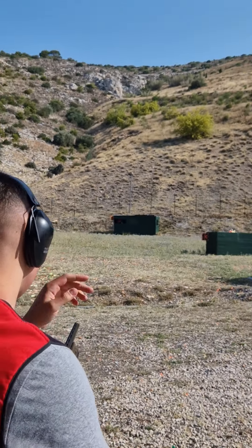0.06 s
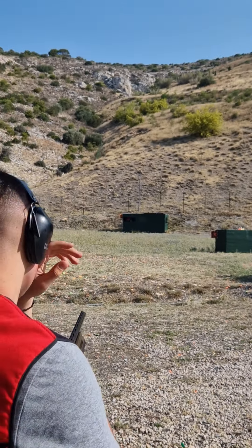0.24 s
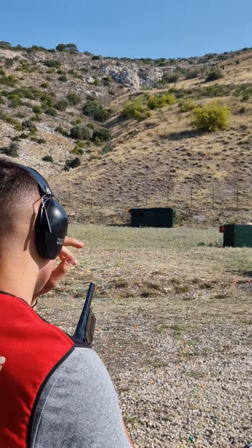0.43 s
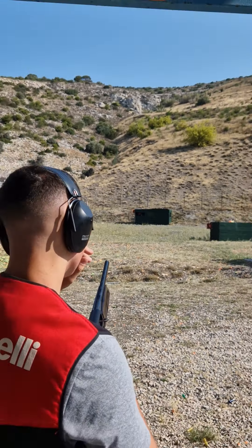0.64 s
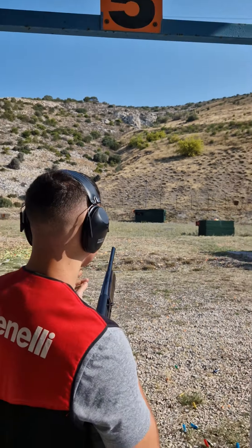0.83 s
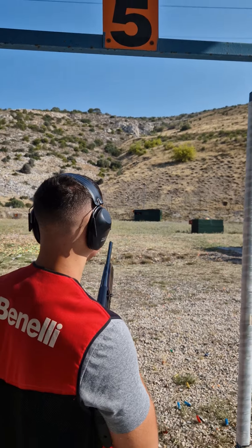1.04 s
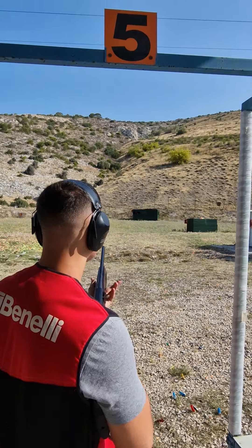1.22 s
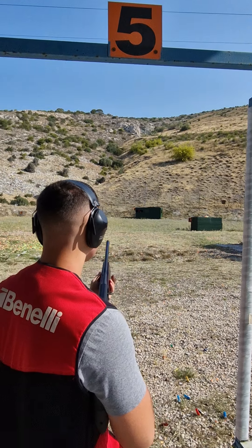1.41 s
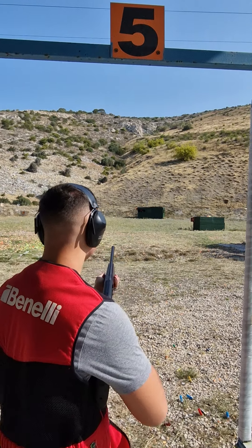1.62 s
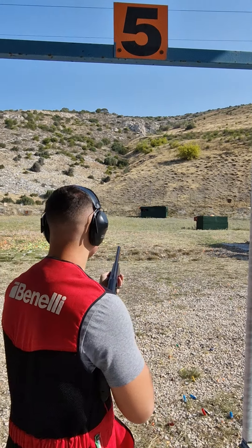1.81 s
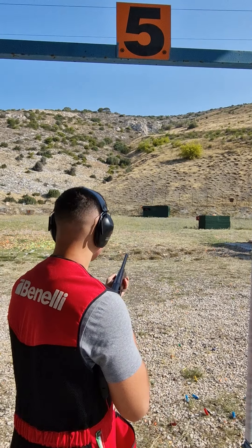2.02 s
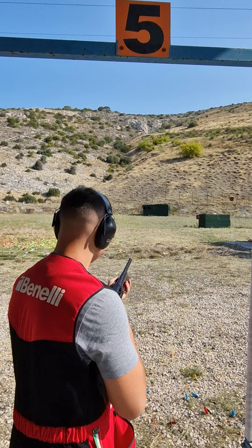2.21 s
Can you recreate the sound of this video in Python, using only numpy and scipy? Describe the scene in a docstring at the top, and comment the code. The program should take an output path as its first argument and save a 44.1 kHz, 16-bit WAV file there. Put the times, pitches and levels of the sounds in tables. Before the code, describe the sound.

One shotgun blast echoes off a hillside, followed by faint gun handling clicks.

```python
"""An open clay range: wind on the microphone, thin hiss, a faint far drone, an earlier shot's dying echo.
At 0.2 s a shotgun fires a metre away: shock front, boom and gas crack, then hard reflections from the
stand, slaps from huts and banks, and scatter off stony ground. From 0.47 s the hillside rolls back.
From 1.1 s the gun is lowered and handled: cloth brushes, steel ticks and rings, the stock knocks."""
import sys
import numpy as np
from scipy import signal
from scipy.fft import rfft, irfft, next_fast_len
from scipy.io import wavfile

SR = 44100
rng = np.random.default_rng(int(sys.argv[2]) if len(sys.argv) > 2 else 0)


def digitize_waveform(pressure):
    """Quantize a signal to 16-bit integers and store it at the path in sys.argv[1].

    Rows of a 2-D input are taken as channels; values are limited to [-1, 1].
    """
    field = np.atleast_2d(pressure).T
    bounded = np.clip(field, -1, 1)
    quanta = np.round(bounded * 32767).astype(np.int16)
    wavfile.write(sys.argv[1], SR, quanta)


N = 103635
T = np.arange(N) / SR
FFT_SIZE = next_fast_len(N, real=True)
HZ = np.maximum(np.arange(FFT_SIZE // 2 + 1) * SR / FFT_SIZE, 1)

# Noise spectra. Each row: frequency in Hz, relative density in dB.
WIND_SPECTRUM = [(25, -7), (45, 4.5), (75, 4), (115, -3), (150, -15.5), (200, -21.5), (280, -23.5),
                 (400, -30)]
HISS_SPECTRUM = [(200, -11.5), (450, -12), (800, -9.5), (1100, -8.5), (1900, -17), (2500, -11.5),
                 (3900, -24), (4500, -4.5), (5500, -2.5), (6400, -14.5), (7600, -8), (11600, -7.5),
                 (12800, -25), (16000, -25)]
RUSTLE_SPECTRUM = [(200, -0.5), (350, 1.5), (700, 3), (1200, 0.5), (1800, -7.5), (2200, -6.5),
                   (4000, -17.5)]
CLICK_SPECTRUM = [(1500, -19), (3000, -4), (5000, 6), (7500, -6), (11000, -4), (16000, -16)]
KNOCK_SPECTRUM = [(100, 5), (220, 5), (700, 2.5), (1900, -3), (2800, -24), (6000, -40)]
HILL_SPECTRUM = [(76, -39.5), (130, -5.5), (236, -18), (373, -9), (482, -9.5), (911, -5.5), (1300, -8.5),
                 (2180, -9.5), (2720, -14), (3250, -10), (6910, -19.5), (7630, -15), (8950, -27),
                 (15000, -47)]
SCATTER_SPECTRUM = [(24, -45), (40, -10.5), (118, 4.5), (189, -3.5), (337, -11), (382, -11), (663, -14),
                    (1440, -6), (1760, -12.5), (2320, -9.5), (2840, -16), (6820, -19), (7730, -18),
                    (9690, -31), (16000, -38)]
CRACK_SPECTRUM = [(120, -26), (250, -1), (400, -8.5), (700, 2.5), (1100, -20), (1500, -7), (2200, -10),
                  (3200, -17), (5200, -10.5), (7700, -15), (9000, -19.5), (16000, -22.5)]
# Likeness of the two microphone ports. Each row: frequency in Hz, correlation.
PORT_CORRELATION = [(130, 0.8), (300, 0.9), (700, .82), (1400, 0.38), (3000, 0.42), (7000, -0.04),
                    (13000, 0.07)]
# Stereo balance. Each row: frequency in Hz, left over right in dB.
PORT_BALANCE = [(100, -1), (300, 1.5), (700, 0), (2300, 1.3), (4400, -1.5), (8000, -6.5), (10000, 2.5),
                (15000, 1.5)]
HISS_BALANCE = [(500, 1), (2000, 2), (5000, -5), (7500, -7.5), (11000, 4)]
BLAST_BALANCE = [(100, 2.5), (700, 4), (2300, 0.5), (4400, -6), (7500, 0), (10000, -2), (15000, 3.5)]
# Wind strength. Each row: time in seconds, level in dB.
GUSTS = [(0, -31.5), (.6, -36), (.86, -37.5), (.92, -31.5), (1.12, -33), (1.24, -41.5), (1.33, -36),
         (1.62, -37), (2.0, -39), (2.12, -42.5), (2.35, -42.5)]
# Cloth strokes. Each row: start in seconds, level in dB, time to peak in seconds.
RUSTLES = [(1.098, -42, 0.019), (1.328, -44.5, 0.021), (1.409, -48.5, 0.048), (1.526, -53.5, 0.036),
           (1.627, -46.5, 0.039), (1.751, -46, 0.045), (1.879, -53.5, 0.027)]
# Gun handling. Each row: start in seconds, click in dB, knock in dB, knock cutoff in Hz,
# left over right in dB.
CONTACTS = [(1.442, -43, -43, 2000, 10), (1.548, -50, -40, 900, -2), (1.586, -40, -38, 2500, -4),
            (1.7841, -58, -29.5, 900, -11), (1.8066, -40, -33.5, 4000, -12),
            (1.835, -39.5, -59.5, 2000, -17), (1.8685, -54, -39, 1470, 10), (1.8772, -42, -45, 1970, -11)]
# Hillside foot, then face. Each row: delay in seconds, level in dB, rise in seconds.
HILL_SLOPES = [(.27, -27.5, 0.017), (.383, -27, 0.0067)]
# Echo decay. Each row: frequency in Hz, time to fall 60 dB in seconds.
HILL_T60 = [(130, 1.7), (300, 4.6), (800, 1.89), (2000, 1.93), (4000, 1.58), (8000, 1.19), (14000, .9)]
SCATTER_T60 = [(60, 0.96), (150, 0.87), (600, 0.97), (1500, 1), (4000, 1), (8000, 1), (14000, 0.95)]
# Echoes from huts and banks. Each row: start in seconds, level in dB, centre in Hz, half-width in
# octaves, time to peak in seconds, left over right in dB, clean share of power from 0 to 1.
SLAPS = [(0.238, -20.5, 840, 0.3, 0.0032, -6, 0), (0.2895, -18.5, 1650, .4, 0.0013, 2, 0.9),
         (.3052, -5.5, 1300, .5, .0008, 2, .8), (.3056, -12, 2400, 1.5, .0006, 0, 0),
         (.3250, -18, 5000, .9, .001, -5, 0), (0.339, -30, 1427, 0.067, .025, 5, 0),
         (0.474, -24.5, 2940, 1.65, .003, -10, 0.02), (0.529, -30, 2960, 1.4, 0.009, -2, 0.04),
         (0.6026, -25.5, 1038, 0.44, 0.0026, 2, 0.5), (0.592, -31, 830, 0.44, 0.066, 0, 0.02)]
# Treble lost on a slap's path. Each row: frequency in Hz, relative gain in dB.
SLAP_AIR_LOSS = [(1000, 1), (7800, -2), (9500, -13), (16000, -15.5)]
# Direct blast, then reflections from the stand. Each row: start in seconds, shock in dB, boom in dB,
# crack in dB, crack decay in seconds, crack cutoff in Hz.
BLAST_ARRIVALS = [(0.2011, -1, -3, -10.5, .02, 18000), (0.2219, -5.5, -17.5, -18.5, .005, 4000),
                  (0.232, -46, -30, -19.5, .008, 12000), (0.2405, -14, -5, -6.5, .007, 4500),
                  (0.2427, -8, -29, -18.5, .007, 3000), (0.2538, -15.5, -22.5, -16.5, .012, 5000)]

SHOT_S, EARLIER_SHOT_S, EARLIER_SHOT_DB = 0.2013, -0.47, -1


def undb(db):
    """Decibels to gain."""
    return 10 ** (np.asarray(db) / 20)


def at(points, hz):
    """Interpolate (Hz, value) rows over log frequency."""
    points_hz, values = np.array(points, float).T
    return np.interp(np.log(hz), np.log(points_hz), values)


def pan(db):
    """Left and right gains for a level difference."""
    return undb(np.array([[1], [-1]]) * db / 2)


def left_first(x, lead_s=0.00009):
    """Sound from the left reaches the right port later."""
    return np.array([x[0], np.interp(T - lead_s, T, x[1])])


def shape(points):
    """Gain per frequency of a spectrum; 12 dB per octave roll-off past its ends."""
    inside = np.minimum(HZ / points[0][0], points[-1][0] / HZ)
    return undb(at(points, HZ)) * np.minimum(1, inside) ** 2


def bell(hz, half_width_oct):
    """Gain per frequency of one resonance."""
    return 1 / (1 + (np.log2(HZ / hz) / half_width_oct) ** 4)


def noise(gain, correlation=None, balance=PORT_BALANCE, grain_db=0):
    """Coloured stereo noise, rms 1; grain roughens it in 24-sample steps."""
    steps = np.clip(rng.standard_normal(N // 24 + 1), -2, 2)
    grains = undb(grain_db * np.repeat(steps, 24)[:N])
    mid, side = rfft(rng.standard_normal((2, N)) * grains, FFT_SIZE)
    alike = np.clip(at(PORT_CORRELATION, HZ) if correlation is None else correlation, 0, 1)
    ports = mid * np.sqrt(1 + alike) + np.array([[1], [-1]]) * side * np.sqrt(1 - alike)
    x = irfft(ports * gain * pan(at(balance, HZ)), FFT_SIZE)[:, :N]
    return x / np.std(x)


def fade(start_s, decay_s):
    """Instant attack, exponential decay."""
    return (T >= start_s) * np.exp(-np.clip((T - start_s) / decay_s, 0, 20))


def swell(start_s, rise_s):
    """Rounded burst, peaking rise_s after its start."""
    u = np.clip((T - start_s) / rise_s, 0, 20)
    return u * np.exp(1 - u)


def tail(x, start_s, rise_s, t60):
    """Fade in from start_s; each octave dies at its own rate."""
    age_s = np.maximum(T - start_s, 0)
    spectrum = rfft(x, FFT_SIZE)
    centres_hz = 31.25 * 2 ** np.arange(10)
    out = 0
    for hz, selector in zip(centres_hz, np.eye(len(centres_hz))):
        band_gain = np.interp(np.log(HZ), np.log(centres_hz), selector)
        band = irfft(spectrum * band_gain, FFT_SIZE)[:, :N]
        out += band * np.exp(-np.log(1000) * age_s / at(t60, hz))
    return out * (1 - np.exp(-age_s / rise_s))


def ambience(hiss_db=-54.5, drone_db=-61.5):
    """Steady thin hiss and a far, narrow-band drone."""
    hiss = noise(shape(HISS_SPECTRUM), balance=HISS_BALANCE)
    drone = noise(bell(hz=749, half_width_oct=0.13))
    return undb(hiss_db) * hiss + undb(drone_db) * drone


def wind(pan_db=3):
    """Gusts rumble on the microphone from the left."""
    rumble = noise(shape(WIND_SPECTRUM), correlation=0.69, balance=[(100, pan_db)])
    gust_db = np.interp(T, *np.array(GUSTS).T)
    return left_first(rumble * undb(gust_db))


def rustle():
    """Sleeve and vest brush the gun in short, dull strokes."""
    strokes = sum(undb(db) * swell(start_s, rise_s) for start_s, db, rise_s in RUSTLES)
    return left_first(noise(shape(RUSTLE_SPECTRUM)) * strokes)


def handling(ring_db=-49.5):
    """Steel ticks, the stock knocks, the barrel rings once."""
    click_noise, knock_noise = noise(shape(CLICK_SPECTRUM)), noise(shape(KNOCK_SPECTRUM))
    ring = noise(bell(hz=2161, half_width_oct=0.025)) * swell(start_s=1.437, rise_s=0.0079)
    out = undb(ring_db) * ring
    for start_s, click_db, knock_db, cutoff_hz, pan_db in CONTACTS:
        click = click_noise * fade(start_s, decay_s=0.00059)
        dulled = signal.lfilter(*signal.butter(1, cutoff_hz, fs=SR), knock_noise)
        knock = dulled / np.std(dulled) * fade(start_s, decay_s=0.0026)
        out += pan(pan_db) * (undb(click_db) * click + undb(knock_db) * knock)
    return out


def hillside(shot_s):
    """The hill on the left returns a long roll, from its foot, then its face."""
    out = 0
    for delay_s, db, rise_s in HILL_SLOPES:
        roll = noise(shape(HILL_SPECTRUM), grain_db=2)
        out += undb(db) * tail(roll, shot_s + delay_s, rise_s, HILL_T60)
    return left_first(out)


def scatter(shot_s, level_db=-11.5):
    """Stony ground and the roof scatter a shot into a grainy tail."""
    wavelets = noise(shape(SCATTER_SPECTRUM), grain_db=3)
    return undb(level_db) * tail(wavelets, shot_s, rise_s=0.019, t60=SCATTER_T60)


def slaps():
    """Single surfaces return short echoes: a clean wavelet if smooth, a smear if rough."""
    air_gain = undb(at(SLAP_AIR_LOSS, HZ))
    out = 0
    for start_s, db, hz, half_width_oct, rise_s, pan_db, clean in SLAPS:
        wavelet = np.sqrt(2 * clean) * np.sin(2 * np.pi * hz * (T - start_s))
        smear = np.sqrt(1 - clean) * noise(bell(hz, half_width_oct) * air_gain)
        out += undb(db) * pan(pan_db) * swell(start_s, rise_s) * (wavelet + smear)
    return out


def blast(shock_s=0.00053, boom_hz=107):
    """Each arrival: shock front, low pressure swing, crack of turbulent gas (duller once reflected)."""
    out = 0
    for start_s, shock_db, boom_db, crack_db, crack_decay_s, cutoff_hz in BLAST_ARRIVALS:
        age_s = T - start_s
        shock = (1 - age_s / shock_s) * fade(start_s, shock_s)
        boom = -np.sin(2 * np.pi * boom_hz * age_s) * fade(start_s, decay_s=0.012)
        crack_gain = shape(CRACK_SPECTRUM) / np.hypot(1, HZ / cutoff_hz)
        crack = noise(crack_gain, balance=BLAST_BALANCE) * fade(start_s, crack_decay_s)
        out += pan(db=2.5) * (undb(shock_db) * shock + undb(boom_db) * boom) + undb(crack_db) * crack
    return out


def scene():
    """Shot and echoes, the earlier shot's tail, gun handling, background."""
    shot = blast() + slaps() + scatter(SHOT_S) + hillside(SHOT_S)
    earlier_echo = undb(EARLIER_SHOT_DB) * (scatter(EARLIER_SHOT_S) + hillside(EARLIER_SHOT_S))
    return shot + earlier_echo + handling() + rustle() + wind() + ambience()


def record(dry):
    """Recorder: bass cut, narrow low-mid dip, soft clipping, top cut."""
    low_cut_hz, top_cut_hz = 30, 16000
    dip_hz, dip_q, dip_share = 449, 4.45, 0.48
    x = signal.sosfilt(signal.butter(1, low_cut_hz, "high", fs=SR, output="sos"), dry)
    x = x - dip_share * signal.lfilter(*signal.iirpeak(dip_hz, dip_q, fs=SR), x)
    lowpass = signal.ellip(8, 0.2, 80, top_cut_hz, fs=SR, output="sos")
    return signal.sosfilt(lowpass, np.tanh(x))


dry = scene()
out = record(dry)
digitize_waveform(out)
```